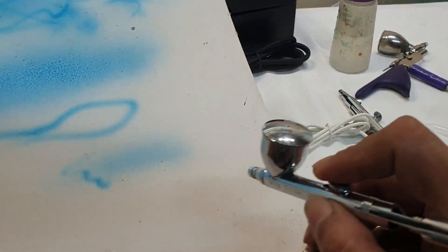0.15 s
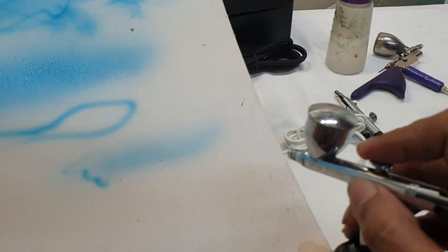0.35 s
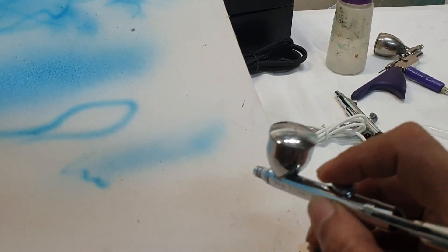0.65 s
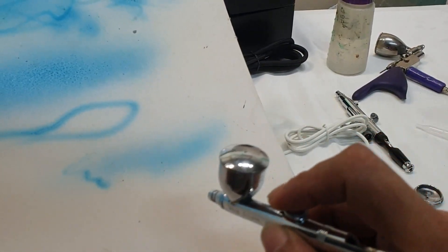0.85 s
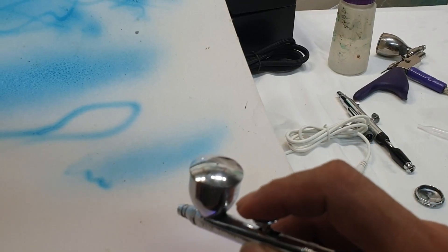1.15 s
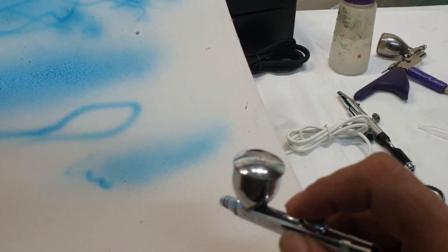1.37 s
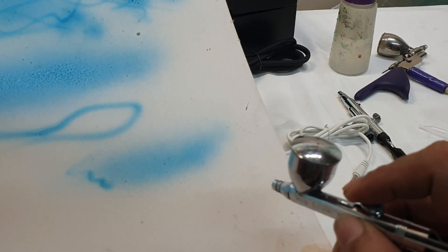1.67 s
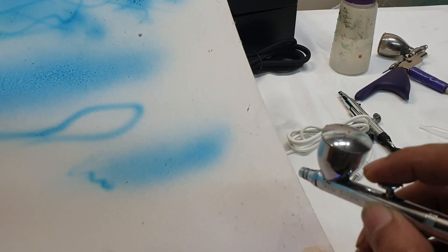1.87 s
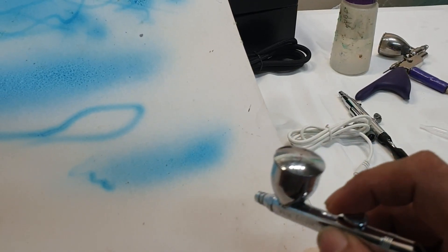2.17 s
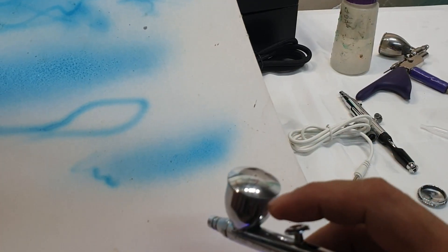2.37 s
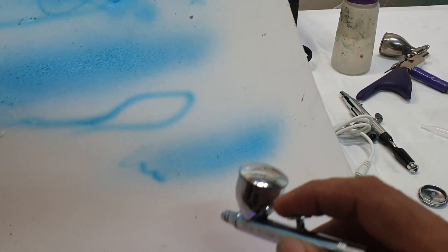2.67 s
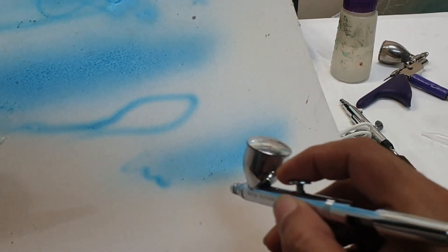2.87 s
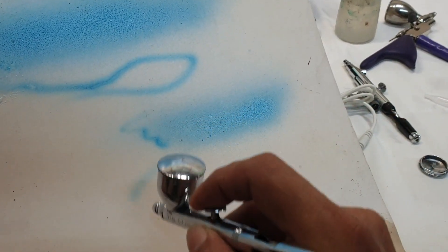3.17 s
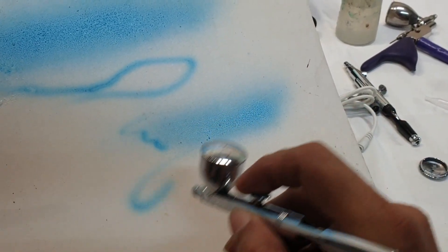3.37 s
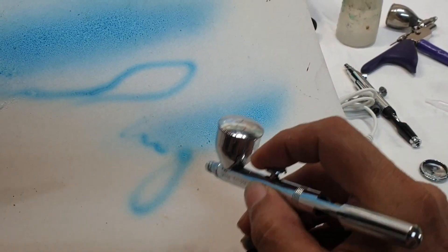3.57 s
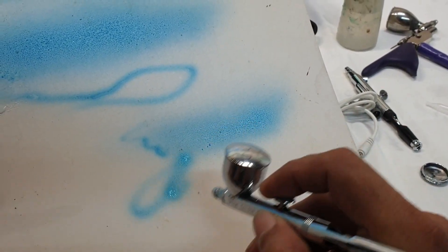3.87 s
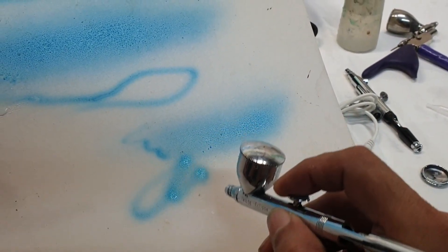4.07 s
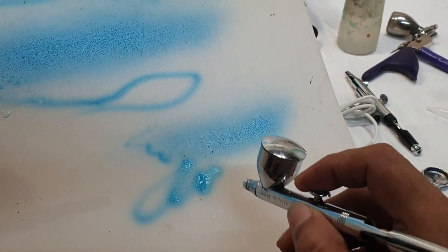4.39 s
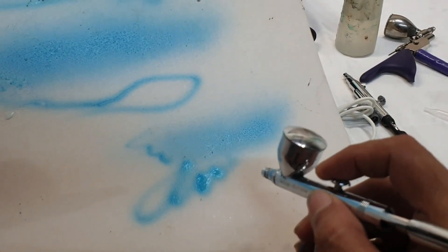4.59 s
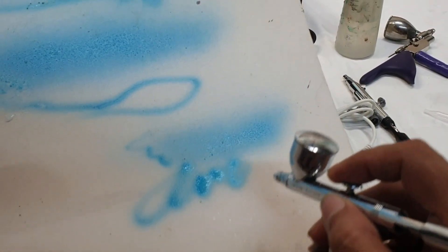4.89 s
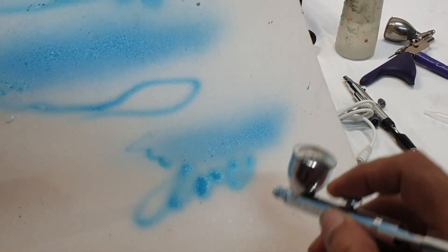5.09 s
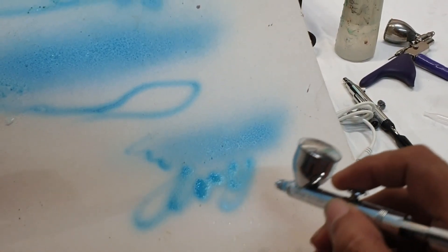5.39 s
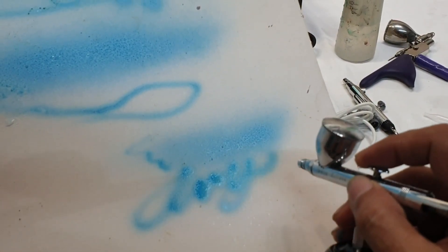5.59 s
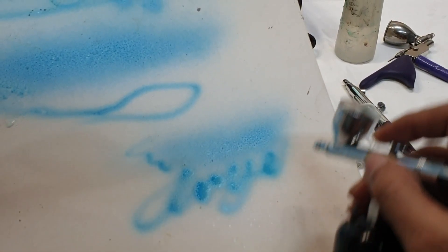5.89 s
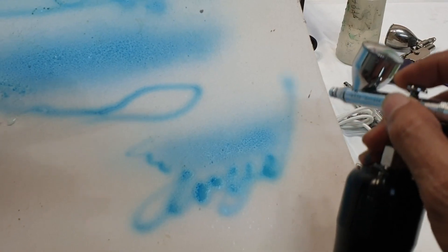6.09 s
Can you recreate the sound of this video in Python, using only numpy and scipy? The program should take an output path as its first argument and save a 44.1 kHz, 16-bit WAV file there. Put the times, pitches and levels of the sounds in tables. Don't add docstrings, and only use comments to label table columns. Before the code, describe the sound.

A steady electric whine near two kilohertz and rushing air open the scene, cutting out and returning almost instantly several times, with crisp trigger clicks at each change. Then a longer quiet gap lets a deep hum and slight skin rustling through. A last press starts a long, purer whine with thinner hiss swelling and dipping in fine strokes. Close microphone, short indoor reverberation.

```python
import sys
import numpy as np
from scipy import signal
from scipy.fft import rfft, irfft, next_fast_len
from scipy.io import wavfile
from scipy.ndimage import uniform_filter1d, map_coordinates

SR = 44100
rng = np.random.default_rng(int(sys.argv[2]) if len(sys.argv) > 2 else 0)


def level_to_linear(level):
    exponent = np.asarray(level, float) / 20
    return 10 ** exponent


def store_wav(level_fs):
    pcm = np.round(np.clip(np.atleast_2d(level_fs), -1, 1) * 32767)
    wavfile.write(sys.argv[1], SR, pcm.T.astype(np.int16))


N = 275179
T = np.arange(N) / SR
STEP = 32

# valve opens t/s, motor cut t/s, run-down shudder level/dB
PRESSES = [
    (-.5, 0.41, -36.5),
    (.552, 1.114, -34),
    (1.243, 1.88, -35.5),
    (2.003, 2.29, -35),
    (2.893, 6.86, -25),
]
# t/s, grip (0 broad strokes, 1 fine lines, 2 last fine lines)
GRIP = [
    (2.3, 0),
    (2.9, 0.9),
    (3.6, 0.94),
    (5.4, 2),
]
# t/s, peak level/dB, cup level/dB, lever level/dB
SNAPS = [(0.4485, -15, -9, -6), (1.1453, -16, -4.5, -12), (1.9143, -13, -13, -13.5),
         (2.3237, -15.5, -12.5, -16), (2.359, -13, -21, -15.5)]


def unit(x):
    return x / np.sqrt(np.mean(x ** 2) + 1e-20)


def along(points, hz):
    f, v = np.transpose(points)
    return np.interp(np.log(hz + 1), np.log(f + 1), v)


def curves(rows):
    s, *cols = np.transpose(rows)
    return [np.interp(T, s, c) for c in cols]


def smooth(points):
    return np.interp(T, T[::STEP], points)


def wander(rate):
    knots = rng.standard_normal(int(N * rate / SR) + 4)
    return map_coordinates(knots, [T[::STEP] * rate])


def wobble(rate):
    return smooth(wander(rate))


def filtered(x, response):
    m = next_fast_len(len(x) + 8192)
    return irfft(rfft(x, m) * response(np.fft.rfftfreq(m, 1 / SR)), m)[:len(x)]


def resonances(modes, f):
    total = 0
    for k, (c, w, db) in enumerate(modes):
        total = total + (-1) ** k * level_to_linear(db) * 1j * f * w / (c * c - f * f + 1j * f * w)
    return total


def rush(spectrum, patchy_db):
    z = signal.stft(rng.standard_normal(N + 512), nperseg=512)[2]
    field = uniform_filter1d(uniform_filter1d(rng.standard_normal(z.shape), 7, 0), 40, 1)
    noise = signal.istft(z * level_to_linear(patchy_db * unit(field)), nperseg=512)[1][:N]
    return unit(filtered(noise, lambda hz: level_to_linear(along(spectrum, hz))))


def room_tone():
    # f/Hz, rms level/dB
    machine_tones = [(57.65, -43), (58.95, -56), (61.9, -60), (53.8, -65), (44.3, -67), (173, -58),
                     (177.5, -65), (230.6, -59), (280, -55), (288.3, -61), (293, -61)]
    # f/Hz, density level/dB
    air_spectrum = [(41, -23), (70, -10), (108, -9.5), (279, -7), (440, -11.5), (577, -9.5), (1140, -19),
                    (1460, -25), (2360, -20.5), (2650, -35), (4550, -52), (7160, -39), (11000, -51),
                    (15700, -62)]
    hum = np.zeros(N)
    for hz, db in machine_tones:
        phase = 2 * np.pi * hz * T + 0.31 * wobble(2.98) + rng.uniform(0, 2 * np.pi)
        hum += level_to_linear(db + 2 + 0.42 * wobble(6.5)) * np.sin(phase)
    return hum + level_to_linear(-51) * rush(air_spectrum, patchy_db=-1.0)


def throttle(spin_up, coast):
    share, current, shudder = np.zeros((3, N))
    for start, cut, shudder_db in PRESSES:
        on = T > start
        rise = 1 - np.exp(-np.clip(T - start, 0, None) / spin_up)
        since = np.clip(T - cut, 0, None)
        share = np.where(on, rise * np.clip(1 - (since / coast) ** 2.2, 0, 1), share)
        current = np.where(on, np.exp(-since / .014), current)
        shudder += level_to_linear(shudder_db) * np.exp(-((since - .045) / 0.024) ** 2) * (since > 0)
    return share, current, shudder


def pump():
    # t/s, 21st shaft order f/Hz, whine level/dB
    full_speed = [(0, 1909, -36), (.72, 1907, -35.5), (1.09, 1910, -38.5), (1.4, 1905, -36.5),
                  (1.6, 1910, -37.5), (1.87, 1907, -37), (2.17, 1899, -36.5), (2.3, 1899, -36),
                  (3.1, 1909, -34), (3.75, 1904, -33.5), (4.77, 1901, -32.5), (5.88, 1900, -33),
                  (6.16, 1901, -36.5), (6.24, 1903, -34)]
    # f/Hz, width/Hz, level/dB
    shell_modes = [(308, 32, 27), (1847, 88, 10)]
    # f/Hz, density level/dB
    valve_spectrum = [(240, -57), (400, -25), (809, -14), (891, -20), (1160, -6.5), (1350, -19.5),
                      (1410, -6), (1870, 5), (3200, -26), (4160, -61), (7040, -120)]
    # multiple of shaft rate, level/dB
    broad_orders = [(1, -11), (2, -17), (3, -13), (4, -15.5), (5, -66.5), (6, -16.5), (7, -12), (8, -5.5),
                    (9, -4.5), (10, -27.5), (11, -4.5), (12, -8), (13, -2.5), (14, -15), (15, -7.5),
                    (16, -2.5), (17, -5.5), (18, -8.5), (19, 0), (20, -6.5), (21, 0.5), (22, -8.5),
                    (23, -1.5), (24, -6.5), (25, -10), (26, -23), (27, -19.5), (28, -24)]
    # multiple of shaft rate, level/dB
    fine_orders = [(1, -17), (2, -19), (3, -15), (4, -12), (5, -68), (6, -16.5), (7, -13), (8, -5.5),
                   (9, -4), (10, -40), (11, -10), (12, -17), (13, -9.5), (14, -16.5), (15, -12.5),
                   (16, -4.5), (17, -7.5), (18, -13), (19, -2.5), (20, -13), (21, 2), (22, -9.5), (23, -1),
                   (24, -1.5), (25, -4), (26, -20), (27, -23), (28, -27.5)]
    # multiple of shaft rate, level/dB
    last_orders = [(1, -20), (2, -22), (3, -19), (4, -21), (5, -81.5), (6, -25), (7, -17), (8, -18),
                   (9, -11.5), (10, -57), (11, -16), (12, -14), (13, -11), (14, -18), (15, -27), (16, -10),
                   (17, -12.5), (18, -24), (19, -8), (20, -11.5), (21, 0), (22, -11.5), (23, -3),
                   (24, -7.5), (25, -11), (26, -31), (27, -26.5), (28, -27)]
    main, poles, split = 21, 4, 15

    top_hz, whine_db = curves(full_speed)
    share, current, shudder = throttle(spin_up=.026, coast=.09)
    full = top_hz / main
    turn = 2 * np.pi * np.cumsum(full * share * (1 + 0.00077 * wobble(25.21))) / SR
    unsettled = np.clip(8 * (1 - share * current), 0, 1)
    grip, = curves(GRIP)
    grid = np.arange(1., 4000)
    shell_gain = np.abs(1 + resonances(shell_modes, grid))

    def shell(hz):
        return np.interp(hz, grid, shell_gain)

    tones, power = np.zeros((2, N)), np.zeros((2, len(T[::STEP])))
    held, loose, top, speed = grip[::STEP], unsettled[::STEP], full[::STEP], share[::STEP]
    order_levels = np.transpose([broad_orders, fine_orders, last_orders])[1, 3:]
    for (k, *_), levels_db in zip(broad_orders[3:], order_levels):
        group = int(k >= split)
        size = level_to_linear(np.interp(held, range(3), levels_db))
        power[group] += size ** 2 / 2
        size = size * level_to_linear(.6 * wander(2.5) + .6 * wander(30) + 3.5 * loose * wander(90))
        if group:
            lag = .7 * np.pi * min(1, ((k - main) / 4) ** 4) + .4 * np.pi * (1 - k % 2)
        else:
            lag = rng.uniform(0, 2 * np.pi)
        drift = .12 * wander(3) + 1.3 * loose * wander(70)
        envelope = smooth(size * shell(k * top * speed) / shell(k * top))
        tones[group] += envelope * np.sin(k * turn - lag + smooth(drift))
    low, high = (tone / smooth(np.sqrt(p)) for tone, p in zip(tones, power))

    valves = rush(valve_spectrum, patchy_db=1.5) * (1 + .6 * np.cos(2 * turn)) * level_to_linear(-13)
    knocks = rng.standard_normal(N) * (1 + np.cos(2 * turn)) ** 2
    rattle = level_to_linear(-8.5) * unsettled * unit(filtered(knocks, lambda f: resonances(shell_modes[1:], f)))
    low_gain = level_to_linear(-41 - 1.22 * grip - whine_db)
    orders = high + low_gain * share ** 6 * low
    steady = share ** 5.0 * orders * (0.42 + 0.66 * current)
    rough = share ** 1.6 * (valves * (1 + 1.03 * unsettled) + rattle)
    cogging = poles * turn + .4 * wobble(90)
    cogs = np.sin(cogging) + .35 * np.sin(1.4 * cogging) + .25 * np.sin(2 * cogging)
    cogs = level_to_linear(2.2 * wobble(90)) * cogs
    return level_to_linear(whine_db) * (steady + rough) + shudder * cogs


def nozzle():
    # t/s, jet level/dB
    flow = [(0, -45.5), (.7, -46), (1.4, -45), (2.3, -45), (2.98, -52.5), (3.4, -46.5), (3.62, -48),
            (4.42, -49.5), (4.85, -48), (5, -51), (5.22, -47.5), (5.33, -53.5), (5.49, -47.5),
            (5.65, -49.5), (5.85, -47.5), (6.24, -50)]
    # f/Hz, density level/dB
    wide_spectrum = [(1410, -60), (2400, -1.5), (2760, -9.5), (3340, -3), (4260, -6.5), (5100, -0.5),
                     (5610, -2.5), (6770, -1), (7920, -4), (9880, -5.5), (11600, -12), (12600, -12),
                     (15700, -20.5)]
    # f/Hz, density level/dB
    fine_spectrum = [(1410, -42), (2400, -4.5), (2540, -20), (2660, -8), (3560, -2.5), (4330, -7.5),
                     (5310, -4.5), (6110, -5), (8310, -7), (10400, -11), (12700, -19.5), (13800, -17.5),
                     (15700, -25)]
    fill_s, hold_s, drain_s = 0.045, -0.0072, 0.023
    stored = .4
    paper_s, paper_drift_s, paper_db = .00028, .000012, -17

    jet_db, = curves(flow)
    pressure, puff = np.zeros((2, N))
    for start, cut, _ in PRESSES:
        opened = T - start - .015
        filling = 1 - (1 - stored) * np.exp(-np.clip(opened, 0, None) / fill_s)
        draining = np.exp(-np.clip(T - cut - hold_s, 0, None) / drain_s)
        pressure += (T > start + .015) * filling * draining
        puff += level_to_linear(-46.5) * np.exp(-((T - start - .014) / 0.011) ** 2)
    fine = np.clip(curves(GRIP)[0], 0, 1)
    noise = (1 - fine) * rush(wide_spectrum, patchy_db=1.6) + fine * rush(fine_spectrum, patchy_db=1.2)
    noise = noise + level_to_linear(paper_db) * np.interp(T - paper_s - paper_drift_s * wobble(1.212), T, noise)

    def below(hz):
        return 1 / (1 + (hz / 7000) ** 12)

    lower = unit(filtered(noise, below))
    upper = unit(filtered(noise, lambda hz: 1 - below(hz)))
    crack = unit(filtered(rng.standard_normal(N), lambda hz: resonances([(7200, 4800, 0)], hz) ** 2))
    jet = level_to_linear(jet_db + 0.21 * wobble(11))
    upper_gain = level_to_linear(-2 + 2 * fine) * pressure ** 1.63
    return jet * (pressure * lower + upper_gain * upper) + puff * crack


def walls(x):
    # f/Hz, T60/s
    decay_times = [(200, 0.29), (2000, 0.28), (10000, 0.072)]
    hz, t, z = signal.stft(rng.standard_normal(SR // 2), SR, nperseg=256)
    tail = signal.istft(z * level_to_linear(-60 * t / along(decay_times, hz)[:, None]), SR, nperseg=256)[1]
    return signal.fftconvolve(np.pad(x, (200, 0)), tail / np.linalg.norm(tail))[:N]


def vent():
    # f/Hz, density level/dB
    sigh_spectrum = [(400, -24), (800, 3.5), (1400, 3.5), (2200, -5.5), (2800, -9.5), (4000, -8),
                     (5400, -9), (6100, -15), (10500, -23), (15700, -40)]
    since = [T - cut - .036 for _, cut, _ in PRESSES]
    sigh = sum((s > 0) * np.exp(-np.clip(s, 0, None) / 0.037) for s in since)
    return level_to_linear(-37.5) * sigh * rush(sigh_spectrum, patchy_db=0.0)


def trigger():
    # t/s, peak level/dB, cup level/dB, lever level/dB
    ticks = [(0.563, -23.5, -20, -5), (1.2518, -18.5, -21, -11.5), (2.0119, -15, -21, -13),
             (2.3702, -36, -21, -16)]
    # t/s, peak level/dB, cup level/dB, lever level/dB
    seats = [(0.5701, -19.5, -8, -5), (1.259, -19, -6, -5.5), (2.0202, -17.5, -12, -8),
             (2.9081, -19, -12, -9)]
    # f/Hz, width/Hz, level/dB
    body = [(1800, 300, 5), (1240, 200, 1.5)]
    # f/Hz, width/Hz, level/dB
    cup = [(2780, 300, -1.5), (3640, 300, 0)]
    # f/Hz, width/Hz, level/dB
    lever = [(4340, 310, -2.5), (5130, 500, -6), (5700, 480, -5)]
    # f/Hz, width/Hz, level/dB
    tip = [(6980, 560, -5.5), (8400, 460, -6), (10000, 1100, -6.5), (12800, 2200, -16)]
    scatter_db = 4

    out, t = np.zeros(N), np.arange(2048) / SR
    kinds = (SNAPS, -8, -14.5), (ticks, -16.5, -7), (seats, -15, -11.5)
    for contacts, body_db, tip_db in kinds:
        for s, db, cup_db, lever_db in contacts:
            chatter = 0.42 * rng.standard_normal(len(t)) * level_to_linear(-60 * t / 0.0096)
            bounces = np.cumsum(rng.uniform(.0007, .0014, size=2))
            chatter[[0, *(bounces * SR).astype(int)]] = 1, .45, .25
            for modes, part_db in zip((body, cup, lever, tip), (body_db, cup_db, lever_db, tip_db)):
                struck = [(hz, width, level + scatter_db / 2 * rng.standard_normal())
                          for hz, width, level in modes]
                ring = filtered(chatter, lambda f: resonances(struck, f) ** 2)
                out[round(s * SR):][:len(t)] += level_to_linear(db + part_db - 1.5) * ring / np.abs(ring).max()
    return out


def spring():
    # f/Hz, width/Hz, level/dB
    spring_modes = [(5330, 45, 2), (2680, 50, -10), (4400, 60, -1)]
    kicks, t = np.zeros(N), np.arange(SR // 20) / SR
    for s, db, _, lever_db in SNAPS:
        kick = level_to_linear(db + lever_db + 1 - 60 * t / .16) * rng.standard_normal(len(t))
        kicks[round(s * SR):][:len(t)] += kick
    return filtered(kicks, lambda f: resonances(spring_modes, f))


def hand():
    # t/s, rustle level/dB
    shifts = [(2.39, -64), (2.449, -63), (2.55, -64.5), (2.65, -64), (2.74, -69), (2.79, -78), (2.88, -84)]
    # f/Hz, density level/dB
    rub_spectrum = [(600, -23), (1000, -10), (1800, -10), (2400, -8.5), (3100, -14), (4200, -21),
                    (5100, -14.5), (6000, -24), (7000, -19), (8200, -27), (11300, -26), (12000, -42),
                    (15700, -50)]
    (start, _), (end, _) = shifts[0], shifts[-1]
    level_db, = curves(shifts)
    gate = uniform_filter1d(1. * (T > start - .03) * (T < end), size=800)
    return gate * level_to_linear(level_db + 9.5) * rush(rub_spectrum, patchy_db=-2.5)


def scene():
    clicks, motor = trigger(), pump()
    room = level_to_linear(-17) * walls(clicks) + level_to_linear(-22) * walls(motor)
    mono = clicks + motor + room + nozzle() + spring() + vent() + hand() + room_tone()
    return np.array([mono, mono])


def roll_off(x):
    return signal.sosfilt(signal.butter(12, 15990, fs=SR, output="sos"), x)


def record(dry):
    count, lowest_hz, highest_hz, span = 19, 4300, 13500, 1.2
    hiss = filtered(rng.standard_normal(N), lambda hz: (hz > 2800) / (1 + hz / 4000))
    side = level_to_linear(-81.5) * unit(hiss)
    slots, picks = (N - 4096) / count, rng.random((count, 2))
    for k, (late, pitch) in enumerate(picks):
        s = (1024 + slots * (k + late)) / SR
        low = lowest_hz * (highest_hz / lowest_hz) ** pitch
        high = low * span
        band = filtered(rng.standard_normal(2048), lambda hz: (hz > low) * (hz < high))
        parting = level_to_linear(-53.5) * (6000 / low) ** 1.1 * np.hanning(2048) ** 2 * unit(band)
        side[round(s * SR) - 1024:][:2048] += parting
    pair = [filtered(x, lambda hz: hz < 15800) for x in (dry[0] + side, dry[1] - side)]
    return roll_off(np.array(pair))


dry = scene()
out = record(dry)
store_wav(out)
```